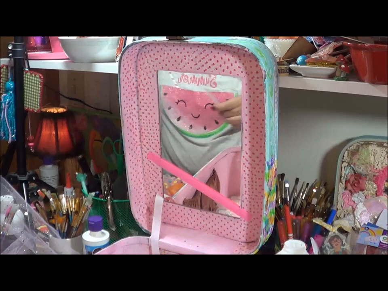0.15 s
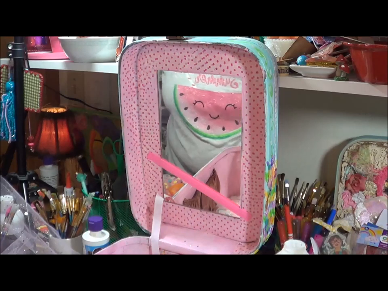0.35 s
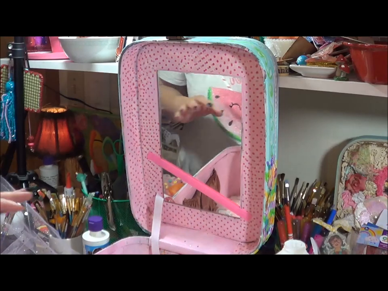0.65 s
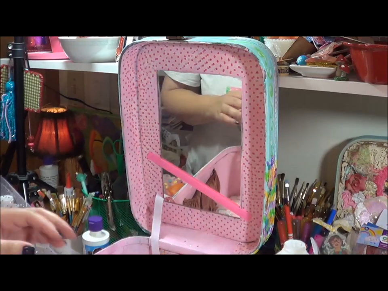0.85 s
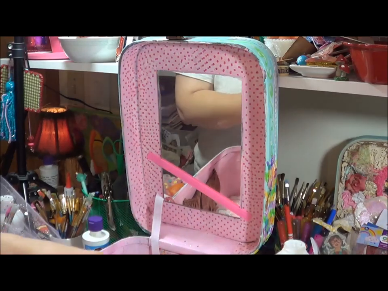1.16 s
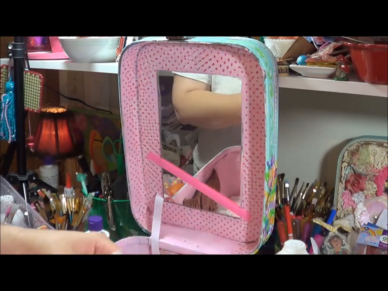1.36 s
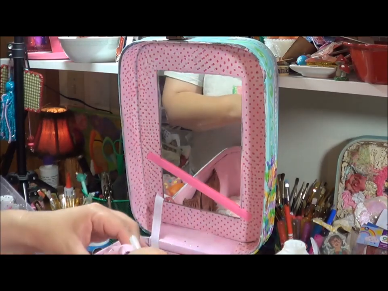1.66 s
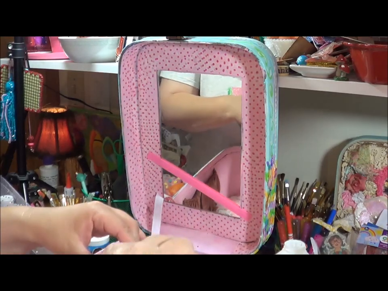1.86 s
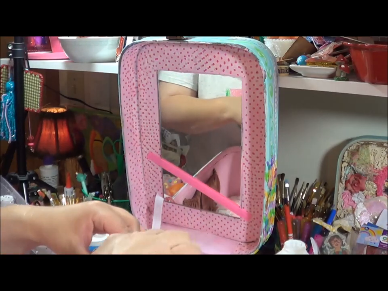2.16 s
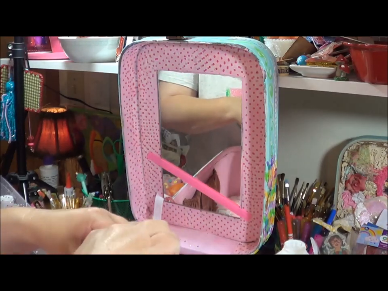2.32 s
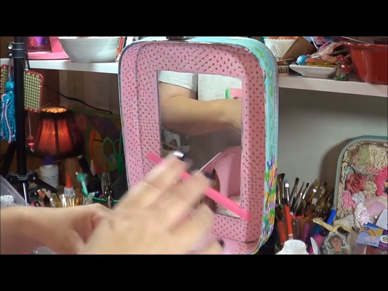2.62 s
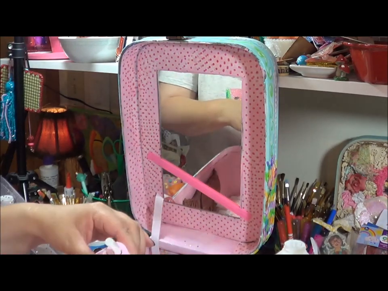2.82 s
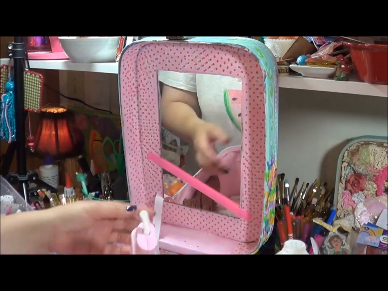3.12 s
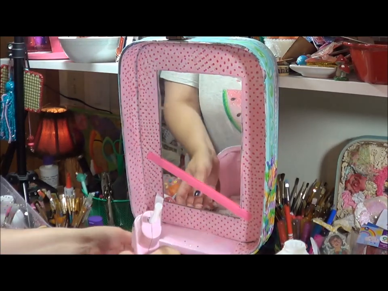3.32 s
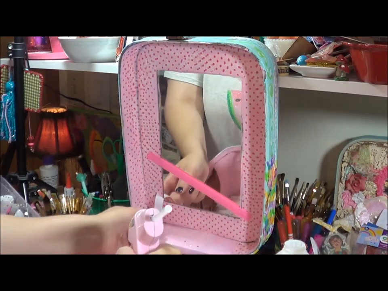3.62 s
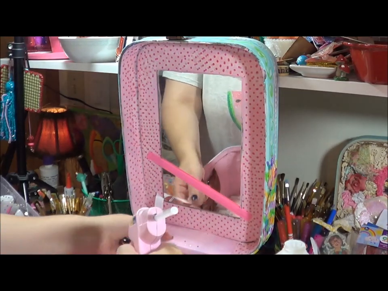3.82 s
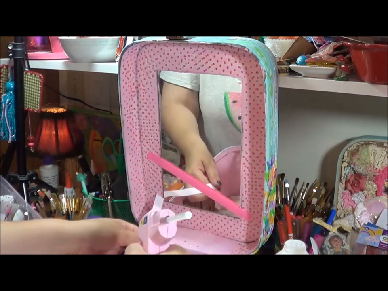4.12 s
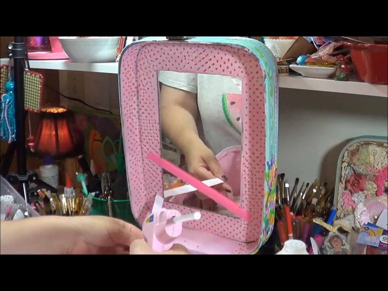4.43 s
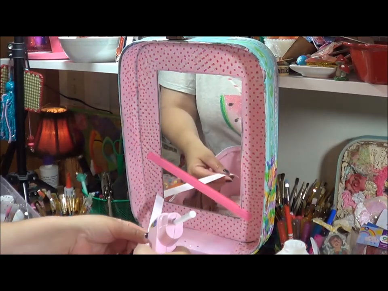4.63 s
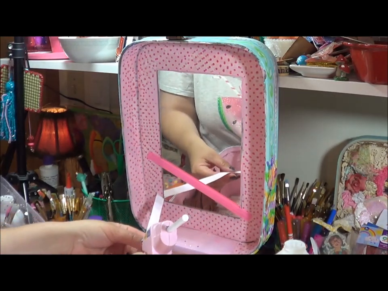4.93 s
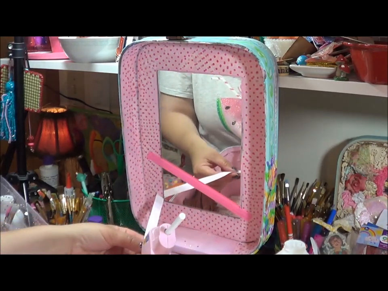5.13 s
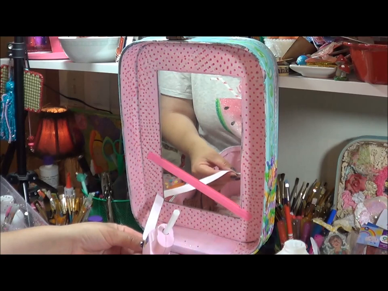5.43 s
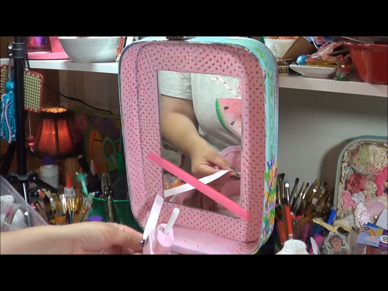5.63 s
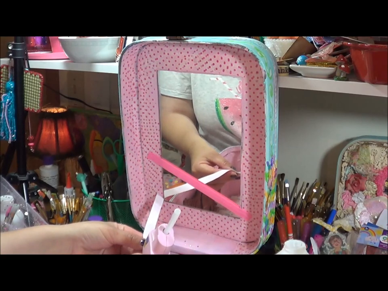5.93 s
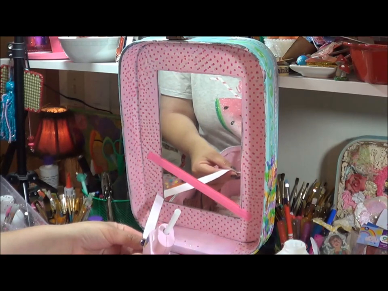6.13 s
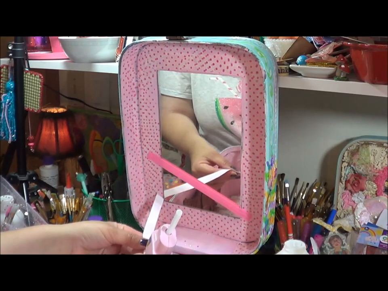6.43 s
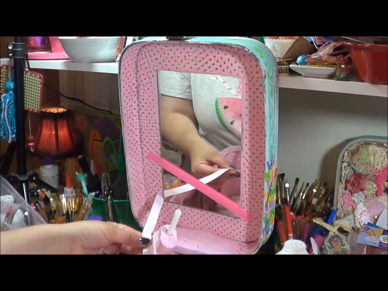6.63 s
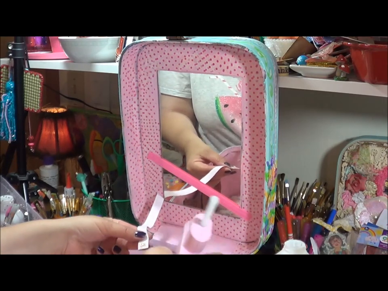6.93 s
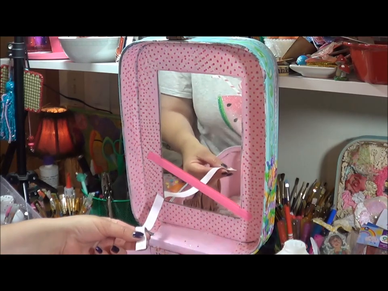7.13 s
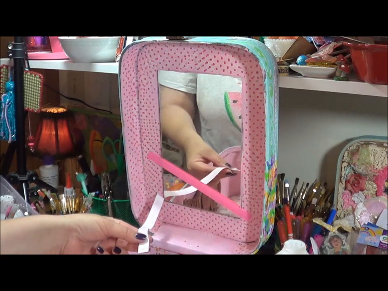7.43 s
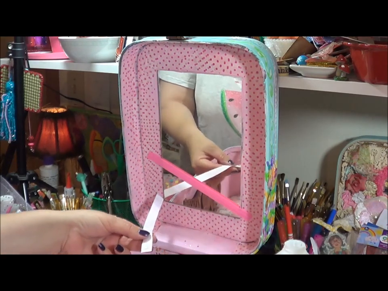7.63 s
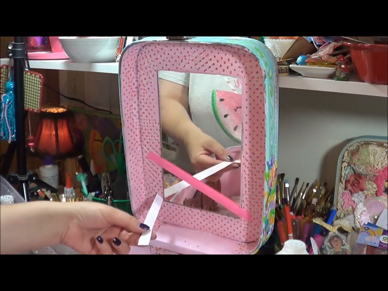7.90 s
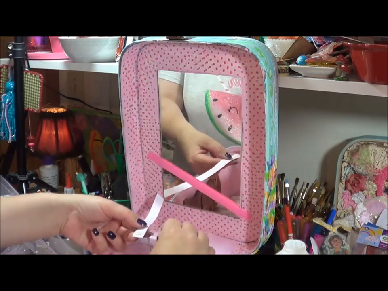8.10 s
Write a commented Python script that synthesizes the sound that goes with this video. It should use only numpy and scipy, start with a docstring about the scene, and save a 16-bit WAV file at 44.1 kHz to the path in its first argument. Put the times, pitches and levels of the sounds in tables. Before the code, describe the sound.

Dry, close handling sounds in a small room with short reflections: damped plastic clicks, hollow bumps on a light case, soft table thuds, papery ribbon scuffs and a brief swish of stiff netting. Activity is scattered at first, has one solid set-down, thins out, then ends in a dense clatter. A low steady hiss of air, a slight whirr and a very thin high whistle lie underneath.

```python
"""In a small cluttered room, hands work at a craft table close to the microphone.
Plastic clicks ring in two or three damped modes; bumps sound a hollow case; landings thud and boom.
Ribbon and plastic rub, ribbon edges tick and a forearm brushes netting: noise shaped by pressure.
Behind them, coloured noise makes room air and a faint motor whirr; two close tones make a thin whistle.
All handling sounds also feed short, dense room reflections."""
import sys
import numpy as np
from scipy import signal
from scipy.fft import rfft, irfft
from scipy.io import wavfile

SR = 44100
rng = np.random.default_rng(int(sys.argv[2]) if len(sys.argv) > 2 else 0)


def waveform_to_disk(signal):
    """Save audio, clipped to [-1, 1], as 16-bit WAV at the path in sys.argv[1]."""
    frames = np.transpose(np.atleast_2d(signal))
    scaled = np.clip(frames, -1, 1) * 32767
    samples = np.round(scaled).astype(np.int16)
    wavfile.write(sys.argv[1], SR, samples)


N = 364266
TIME = np.arange(N) / SR
SHORT_TIME = np.arange(4096) / SR   # the time axis of one short sound, in seconds
CUTOFF_HZ = 15800   # nearly all sound stays below this


def from_db(db):
    """Decibels to gain."""
    return 10 ** (np.asarray(db) / 20)


def rms_one(x):
    """Scale to unit rms."""
    return x / np.sqrt(np.mean(x ** 2) + 1e-20)


def at_hz(points, hz, column=1):
    """Read one column of a table at any pitch, on a log-frequency axis."""
    points = np.array(points)
    return np.interp(np.log(np.maximum(hz, 1)), np.log(points[:, 0]), points[:, column])


def gain_curve(rows):
    """Turn rows of (s, dB) into a gain at every sample."""
    return from_db(np.interp(TIME, *np.transpose(rows)))


def band(x, low_hz, high_hz, order=2):
    """Keep only the pitches between two limits."""
    limits = [low_hz, min(high_hz, SR / 2 - 500)]
    return signal.sosfilt(signal.butter(order, limits, "band", fs=SR, output="sos"), x)


def add(track, start_s, sound):
    """Mix a short sound into the track."""
    at = max(round(start_s * SR), 0)
    track[at:at + len(sound)] += sound[:N - at]


def colour(x, points):
    """Weight each pitch by a table of (Hz, dB)."""
    return irfft(rfft(x) * from_db(at_hz(points, np.fft.rfftfreq(len(x), 1 / SR))), len(x))


def noise(spectrum):
    """Coloured noise of unit rms."""
    return rms_one(colour(rng.standard_normal(N), spectrum))


def grain(depth_db, low_hz, high_hz):
    """An irregular flutter of the level: slow noise used as decibels, scaled to unit rms."""
    flutter = rms_one(band(rng.standard_normal(N), low_hz, high_hz))
    return rms_one(from_db(depth_db * flutter))


def spread(mid, side, width):
    """Left and right from a mid and a side signal, with a stereo width that depends on pitch."""
    side = colour(side, width)
    return np.array([mid + side, mid - side])


def set_level(shape, db):
    """Give a short sound its level, as rms over a hundredth of a second."""
    return from_db(db) * shape / np.sqrt(np.sum(shape ** 2) * 100 / SR + 1e-20)


def ring(hz, cycles, db):
    """A heavily damped resonance swells, dies within a few cycles and gives little below its pitch."""
    age = SHORT_TIME * hz / cycles
    wave = age * np.exp(-age) * np.sin(2 * np.pi * hz * SHORT_TIME)
    return set_level(band(wave, hz * 0.36, CUTOFF_HZ), db)


def crack(low_hz, high_hz, decay_s, db):
    """The brief noisy crush of two surfaces meeting."""
    crush = rng.standard_normal(len(SHORT_TIME)) * np.exp(-SHORT_TIME / decay_s)
    return set_level(band(crush, low_hz, high_hz), db)


def swell(peak_s, rise_s, fall_s):
    """Pressure of a stroke grows to 1 at its peak, then fades."""
    return np.exp(-np.minimum(np.maximum((peak_s - TIME) / rise_s, (TIME - peak_s) / fall_s), 20))


# How loud the air and whirr are over time: start_s [s], level_db [dB]
AIR_LOUDNESS = [(0.0, -49.3), (0.7, -49), (0.9, -47.3), (2.2, -46), (4.8, -45.5), (6.3, -46.5), (7.6, -44),
                (8.0, -47.5)]
# Tone colour of the room air: pitch_hz [Hz], relative level_db [dB per Hz]
AIR_COLOUR = [(15, -60), (25, -9.5), (103, -2), (141, -2.5), (247, -2.5), (661, -7.5), (1100, -9.5),
              (1190, -9.5), (1390, -10), (2250, -12.5), (3630, -12), (5270, -15), (14500, -16.5)]
# Stereo width of the room air: pitch_hz [Hz], side_against_mid_db [dB]
AIR_STEREO = [(60, -14), (150, -6.5), (380, 1.5), (950, 5), (2380, -1), (5980, -4), (15000, -22)]
# Bands of the motor whirr: pitch_hz [Hz], width_hz [Hz], level_db [dB against the air]
WHIRR_BANDS = [(2430, 80, -13), (3556, 85, -13), (4330, 250, -12.7), (6020, 42, -16.5), (7430, 250, -13.5)]
# Two close tones of the thin whistle: pitch_hz [Hz], level_db [dB, peak]
WHISTLE_TONES = [(15734, -53.5), (15747, -58)]


def background():
    """Room air and a small motor's whirr rise and sink together, under a very high beating whistle."""
    air = spread(noise(AIR_COLOUR), noise(AIR_COLOUR), AIR_STEREO)
    whirr = np.zeros((2, N))
    for hz, width_hz, db in WHIRR_BANDS:
        hum = band(rng.standard_normal((2, N)), hz - width_hz / 2, hz + width_hz / 2, order=1)
        whirr += from_db(db) * rms_one(hum)
    whistle = sum(from_db(db) * np.sin(2 * np.pi * hz * TIME) for hz, db in WHISTLE_TONES)
    return gain_curve(AIR_LOUDNESS) * (air + whirr) + whistle


# Sliding strokes: peak_s (greatest pressure) [s], rise_s [s], fall_s [s], plastic_db [dB], ribbon_hiss_db [dB]
SLIDING_STROKES = [(0.741, 0.02, 0.0078, -30.5, -42), (0.845, 0.028, 0.028, -44.5, -63),
                   (1.16, 0.44, 0.15, -53.5, -49), (1.469, 0.044, 0.041, -37, -45),
                   (1.67, .067, 0.083, -59, -48), (2.088, 0.016, 0.014, -37.5, -28),
                   (2.362, 0.13, 0.42, -54, -49.5), (3.001, 0.034, 0.046, -44, -39.5),
                   (3.65, 0.027, 0.021, -42, -47), (4.11, 0.097, .055, -63, -46),
                   (4.62, .027, 0.024, -41, -41.5), (4.87, 0.18, .2, -52.5, -47),
                   (6.87, 0.054, 0.043, -43, -49), (7.07, 0.053, 0.17, -45, -42),
                   (7.205, 0.026, 0.057, -37.5, -31.5), (7.3, .008, 0.0091, -42.5, -34.5),
                   (7.808, 0.0073, 0.01, -23.5, -24.5), (7.914, 0.026, 0.0095, -44, -38.5),
                   (8.23, 0.057, .067, -56, -43)]
# Tone colour of rubbed ribbon: pitch_hz [Hz], relative level_db [dB per Hz]
RIBBON_COLOUR = [(50, -54), (300, 3), (1500, -9), (3000, -6), (6000, 2), (10000, 6), (13000, -1),
                 (15500, -9.5)]
# Tone colour of rubbed plastic: pitch_hz [Hz], relative level_db [dB per Hz]
PLASTIC_COLOUR = [(50, -48), (250, -11), (750, -7.5), (1200, 6), (1600, 2), (2250, 4.5), (3000, -4.5),
                  (6000, -10.5), (15000, -53)]
# A landed thing slides to rest; both levels are against its scuff
SLIDE_RISE_S, SLIDE_FALL_S, SLIDE_PLASTIC_DB, SLIDE_HISS_DB = 0.0064, 0.036, -7.5, -7
# A ticking edge slips free; both levels are against its tick
RELEASE_RISE_S, RELEASE_FALL_S, RELEASE_PLASTIC_DB, RELEASE_HISS_DB = 0.002, 0.012, -5, -1
HOLDING_DB = -64   # steady hiss of the ribbon merely held in the fingers


def rubbing():
    """Friction swells with strokes, landings and ticks: ribbon crackles, plastic slips more slowly."""
    slides = [(s + SLIDE_RISE_S, SLIDE_RISE_S, SLIDE_FALL_S,
               scuff_db + SLIDE_PLASTIC_DB, scuff_db + SLIDE_HISS_DB) for s, *_, scuff_db in LANDINGS]
    releases = [(s + 0.0027, RELEASE_RISE_S, RELEASE_FALL_S,
                 db + RELEASE_PLASTIC_DB, db + RELEASE_HISS_DB) for s, db, _ in EDGE_TICKS]
    plastic_power, ribbon_power = 0, from_db(HOLDING_DB) ** 2
    for peak_s, rise_s, fall_s, plastic_db, hiss_db in SLIDING_STROKES + slides + releases:
        power = swell(peak_s, rise_s, fall_s) ** 2
        plastic_power = plastic_power + power * from_db(plastic_db) ** 2
        ribbon_power = ribbon_power + power * from_db(hiss_db) ** 2
    crackle = grain(depth_db=2.0, low_hz=52, high_hz=350)
    slips = grain(depth_db=2.0, low_hz=30, high_hz=220)
    plastic = slips * np.sqrt(plastic_power) * noise(PLASTIC_COLOUR)
    ribbon = crackle * np.sqrt(ribbon_power) * noise(RIBBON_COLOUR)
    return plastic + ribbon


# Fingers and tools bumping the hollow case: start_s [s], level_db [dB], pitch_hz [Hz], clack_db [dB]
CASE_BUMPS = [(0.038, -24, 770, -35), (0.046, -24.5, 950, -27), (0.173, -43, 567, -66),
              (0.253, -35.5, 537, -48), (0.326, -35, 584, -48), (0.337, -33, 685, -54),
              (0.776, -36, 530, -37.5), (3.351, -27, 600, -52), (3.417, -23, 660, -42.5),
              (3.473, -34.5, 616, -54), (3.538, -37.5, 620, -52), (3.647, -43.5, 555, -54),
              (4.826, -34.5, 486, -37.5), (4.937, -30, 480, -38.5), (5.013, -34, 460, -50),
              (6.384, -43, 436, -55), (7.176, -39, 523, -44), (7.560, -25, 604, -48),
              (7.806, -31.5, 590, -41), (7.82, -21.5, 940, -22)]


def knocks():
    """A soft contact makes the hollow case and the table answer; loose contents rattle dully."""
    out = np.zeros(N)
    for start_s, db, hz, clack_db in CASE_BUMPS:
        case = ring(hz, cycles=0.61, db=db) + ring(hz * 1.295, cycles=0.94, db=db - 9)
        table = ring(307, cycles=0.33, db=db - 10)
        rattle = crack(hz * 0.35, hz * 1.43, decay_s=0.016, db=db - 12)
        clack = crack(790, 2380, decay_s=0.0045, db=clack_db)
        add(out, start_s, case + table + rattle + clack)
    return out


# Things set down on the table: start_s [s], pitch_hz [Hz], thud_db [dB], boom_db [dB], scuff_db [dB]
LANDINGS = [(0.042, 309, -25, -39.5, -29.5), (0.255, 236, -35, -67, -62), (0.33, 270, -35, -66, -64),
            (0.362, 480, -35.5, -60, -57), (0.777, 273, -33.5, -47, -40), (3.331, 260, -22, -30, -28.5),
            (7.587, 367, -29.5, -50, -33.5), (7.639, 271, -25.5, -46, -33.5), (7.686, 428, -34.5, -56, -55),
            (7.825, 265, -32, -45.5, -32)]
BOOM_HZ, FRAME_HZ = 136, 63   # the table top and its frame
# The frame has FRAME_DB when the boom has HEAVY_DB, and changes by FRAME_GROWTH dB for each dB of boom
FRAME_DB, HEAVY_DB, FRAME_GROWTH = -31, -29.5, 3.9
SETTLE_S, SETTLE_PITCH, SETTLE_LOSS_DB = 0.00706, 1.476, 8   # the second edge: later, higher, softer


def thuds():
    """An object lands edge by edge and scuffs; the table top booms and a heavy landing shakes the frame."""
    out = np.zeros(N)
    for start_s, hz, thud_db, boom_db, scuff_db in LANDINGS:
        first_edge = ring(hz, cycles=1.0, db=thud_db)
        frame = ring(FRAME_HZ, cycles=0.7, db=FRAME_DB + FRAME_GROWTH * (boom_db - HEAVY_DB))
        scuff = crack(800, 10400, decay_s=0.015, db=scuff_db)
        add(out, start_s, first_edge + frame + scuff)
        second_edge = ring(hz * SETTLE_PITCH, cycles=0.78, db=thud_db - SETTLE_LOSS_DB)
        boom = ring(BOOM_HZ, cycles=1.1, db=boom_db)
        add(out, start_s + SETTLE_S, second_edge + boom)
    return out


# Hard plastic contacts: start_s [s], lower_mode_db [dB], lower_mode_hz [Hz], upper_mode_db [dB],
# upper_mode_hz [Hz], snap_reference_db [dB] (the parts of the snap are set against it)
PLASTIC_CONTACTS = [(0.173, -44, 1300, -50, 1920, -57), (0.6766, -29.5, 1300, -33, 1850, -55),
                    (0.817, -40.5, 1580, -37, 1970, -61), (1.2265, -43, 1370, -54, 1810, -57),
                    (1.4719, -25.5, 1560, -25, 2070, -31), (2.211, -32, 1370, -26.5, 2300, -17.5),
                    (2.2881, -35, 1220, -37, 1800, -47.5), (2.3096, -38.5, 1280, -51, 2400, -56),
                    (2.3606, -21.5, 1324, -29.5, 2070, -36.5), (2.4118, -31.5, 1290, -51, 2350, -52),
                    (2.618, -43, 1360, -48, 2170, -65), (2.9955, -40, 1390, -41, 2240, -57),
                    (3.647, -40.5, 1110, -60, 2430, -49), (4.7152, -45, 1290, -52, 1820, -53),
                    (5.324, -47.5, 1040, -52, 2260, -53), (5.547, -49, 1460, -48, 2270, -50),
                    (6.7706, -52, 1500, -46, 2230, -47), (6.831, -29.5, 1020, -43.5, 2220, -52),
                    (6.9339, -42, 1110, -37, 1920, -55), (6.983, -30, 1200, -38, 1970, -41),
                    (7.1755, -32.5, 1220, -60, 1750, -56), (7.5597, -26.5, 1160, -17.5, 1930, -29),
                    (7.7931, -19.5, 1600, -25, 1950, -29), (7.806, -23.5, 1600, -45, 1720, -30),
                    (7.8281, -30.5, 1170, -28, 2060, -31)]
TOUCH_EARLY_S, TOUCH_DB, TOUCH_FIZZ_DB = 0.0019, -15, -13   # one edge touches first; against the click
FIZZ_OVER_SNAP_DB, FIZZ_UNDER_MODES_DB = 6, 4   # fizz follows the snap but stays below the louder mode
REBOUND_DB = -13.5   # the struck thing touches once more, more softly


def clicks():
    """Hard plastic touches, rings in its damped modes, nudges the case, snaps in the treble and rebounds."""
    out = np.zeros(N)
    for start_s, lower_db, lower_hz, upper_db, upper_hz, snap_db in PLASTIC_CONTACTS:
        modes = ring(lower_hz, cycles=1.11, db=lower_db) - ring(upper_hz, cycles=1.7, db=upper_db)
        chatter_db = (lower_db + upper_db) / 2 - 1
        chatter = crack(lower_hz * 0.84, upper_hz * 1.41, decay_s=0.0071, db=chatter_db)
        case = ring(546, cycles=0.4, db=lower_db - 27)
        snap = crack(3550, 6160, decay_s=0.00092, db=snap_db - 3)
        third_mode = ring(3500, cycles=2.9, db=snap_db - 6)   # set ringing by the snap
        fizz_db = min(snap_db + FIZZ_OVER_SNAP_DB, max(lower_db, upper_db) - FIZZ_UNDER_MODES_DB)
        fizz = crack(5100, 10500, decay_s=0.0038, db=fizz_db)
        first_touch = from_db(TOUCH_DB) * modes + from_db(TOUCH_FIZZ_DB) * fizz
        add(out, start_s - TOUCH_EARLY_S, first_touch)
        add(out, start_s, modes + chatter + case + snap + third_mode + fizz)
        rebound_s = rng.uniform(0.0078, 0.0102)
        add(out, start_s + rebound_s, from_db(REBOUND_DB) * (modes + fizz))
    return out


# Fingernail and ribbon-edge ticks: start_s [s], level_db [dB], pitch_hz [Hz]
EDGE_TICKS = [(0.878, -42, 6500), (0.9607, -36.5, 5100), (1.17, -42, 7940), (1.7243, -36, 8300),
              (2.1348, -37.5, 8900), (3.7133, -35, 9500), (4.4716, -40, 9400), (5.121, -46, 9850),
              (7.1742, -33, 8200)]


def ticks():
    """Nails and ribbon edges catch and let go, each a tiny burst of noise around its pitch."""
    out = np.zeros(N)
    for start_s, db, hz in EDGE_TICKS:
        add(out, start_s, crack(hz * 0.37, hz * 1.93, decay_s=0.0027, db=db))
    return out


# A forearm brushing stiff netting: peak_s (greatest pressure) [s], rise_s [s], fall_s [s], level_db [dB]
NETTING_BRUSHES = [(0.97, .015, 0.072, -49), (1.455, 0.014, 0.044, -40), (2.0, 0.42, .25, -53.5)]
# Tone colour of the netting: pitch_hz [Hz], relative level_db [dB per Hz]
NETTING_COLOUR = [(500, -33), (3000, -15), (4500, -9), (5600, 5), (6600, -9), (9000, -10), (15000, -25)]


def netting():
    """Stiff mesh swishes in a narrow bright band, made grainy as its threads catch."""
    power = sum((from_db(db) * swell(peak_s, rise_s, fall_s)) ** 2
                for peak_s, rise_s, fall_s, db in NETTING_BRUSHES)
    return np.sqrt(power) * grain(depth_db=4.0, low_hz=40, high_hz=600) * noise(NETTING_COLOUR)


# How the room answers: pitch_hz [Hz], time to fade by 60 dB, fade_s [s], reflected_db [dB]
ROOM_ECHO = [(79.5, 0.042, 4), (294, 0.17, -2.5), (760, 0.16, -1.5), (1860, 0.14, -6), (4760, 0.2, -10.5),
             (14000, 0.1, -9.5)]
# Stereo width of the reflections: pitch_hz [Hz], side_against_mid_db [dB]
ROOM_STEREO = [(60, -30), (250, -15), (600, -12), (2000, -7), (5000, -2), (8000, 3.5), (13000, -28)]


def room(x, first_s=0.004):
    """Dense reflections from table, shelves and walls: noise that fades at its own rate in each band."""
    t = np.arange(SR // 2) / SR
    edges = np.geomspace(45, 16000, 11)
    echoes = np.zeros((2, len(t)))
    for low, high in zip(edges, edges[1:]):
        hz = np.sqrt(low * high)
        fade = from_db(-60 * t / at_hz(ROOM_ECHO, hz))
        tail = band(rng.standard_normal((2, len(t))), low, high, order=3) * fade
        tail = tail / np.sqrt(np.sum(tail ** 2, axis=1, keepdims=True))
        # a wider band carries more energy
        echoes += tail * np.sqrt(2 * (high - low) / SR) * from_db(at_hz(ROOM_ECHO, hz, column=2))
    response = np.pad(spread(*echoes, ROOM_STEREO), ((0, 0), (round(first_s * SR), 0)))
    return signal.fftconvolve(x[None], response, axes=1)[:, :N]


def scene():
    """All handling sounds share the small room; the knocks excite it half a decibel more."""
    bumps = knocks()
    other_handling = rubbing() + thuds() + clicks() + ticks() + netting()
    reflections = room(other_handling + from_db(0.5) * bumps)
    return background() + bumps + other_handling + reflections


OVERLOAD = 0.85   # rounded peaks cannot pass this height (full scale is 1)


def record(dry):
    """The highest peaks are rounded and the top is cut steeply."""
    rounded = dry / (1 + (dry / OVERLOAD) ** 6) ** (1 / 6)
    return signal.sosfilt(signal.ellip(12, 0.1, 80, CUTOFF_HZ, fs=SR, output="sos"), rounded)


dry = scene()
out = record(dry)
waveform_to_disk(out)
```